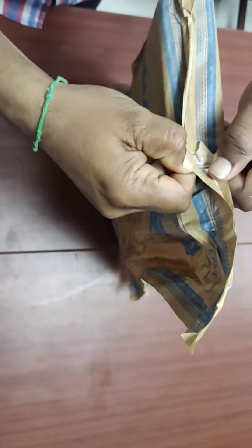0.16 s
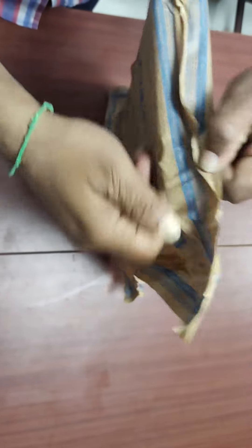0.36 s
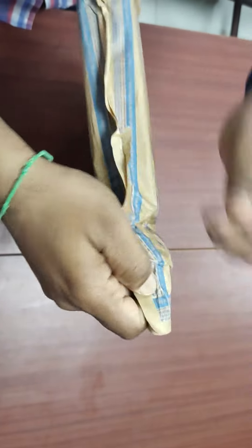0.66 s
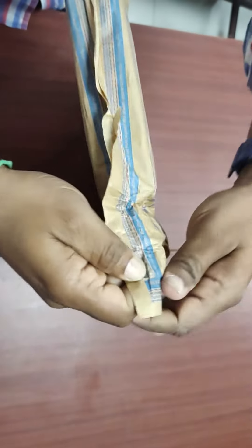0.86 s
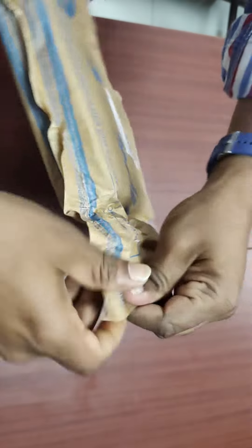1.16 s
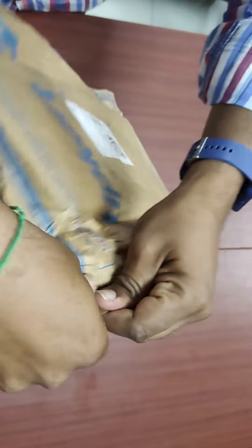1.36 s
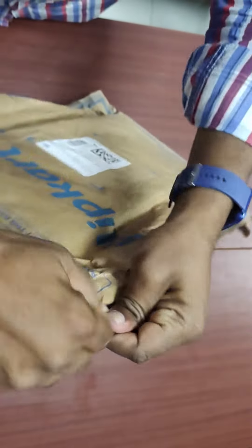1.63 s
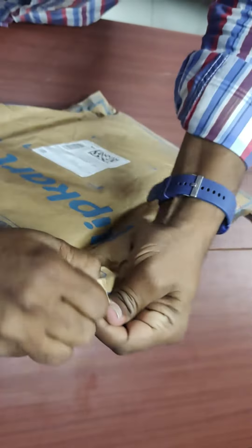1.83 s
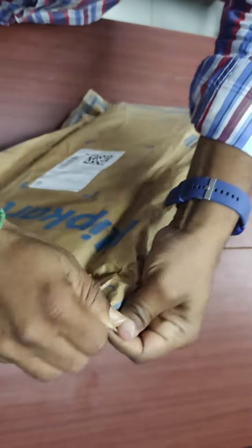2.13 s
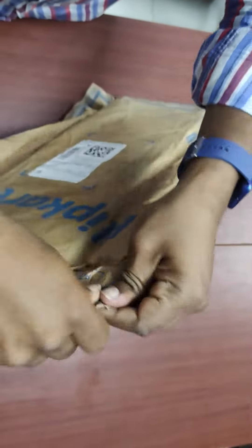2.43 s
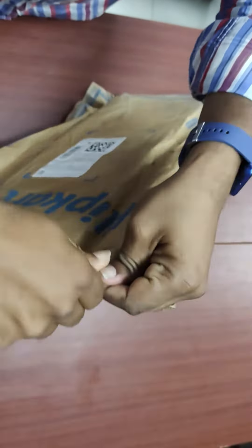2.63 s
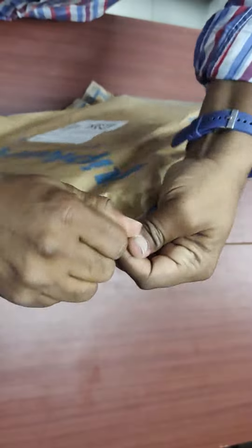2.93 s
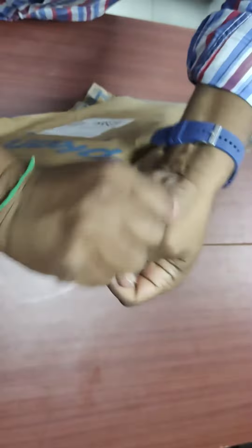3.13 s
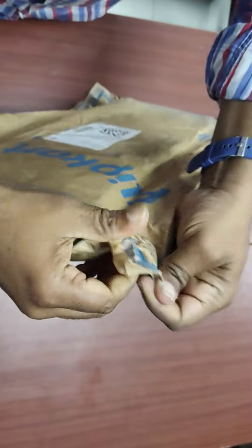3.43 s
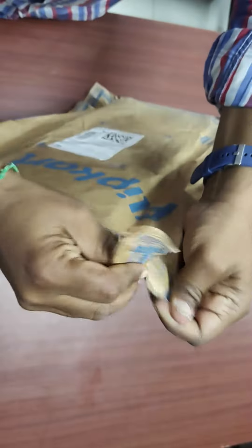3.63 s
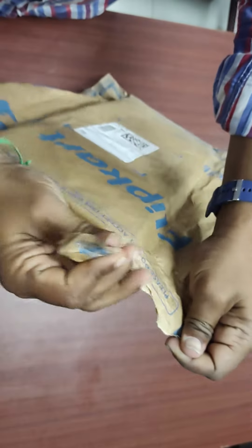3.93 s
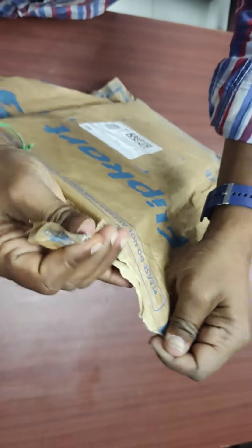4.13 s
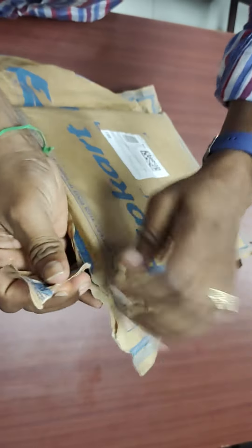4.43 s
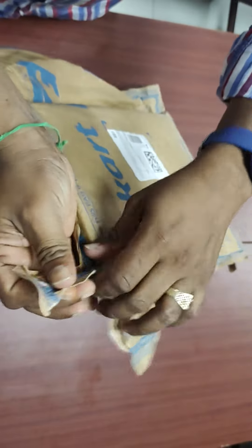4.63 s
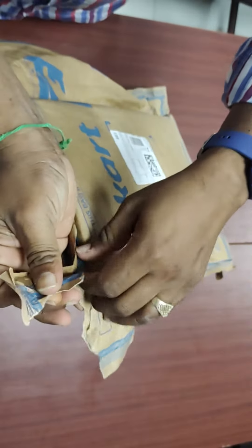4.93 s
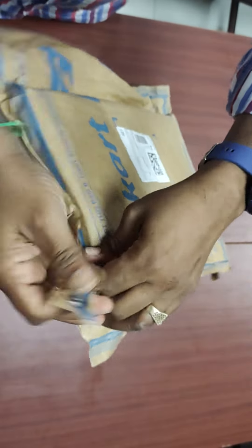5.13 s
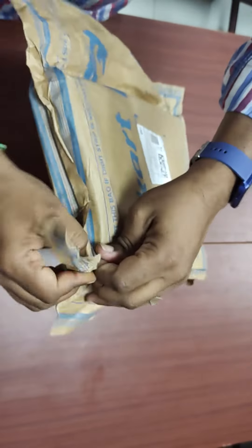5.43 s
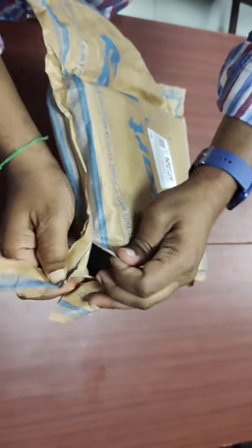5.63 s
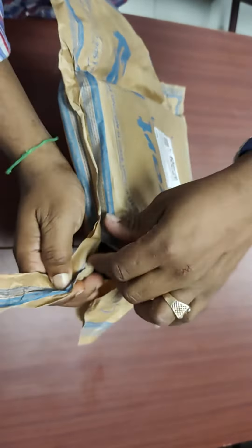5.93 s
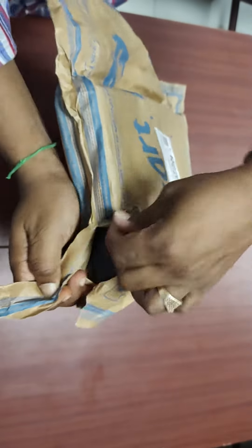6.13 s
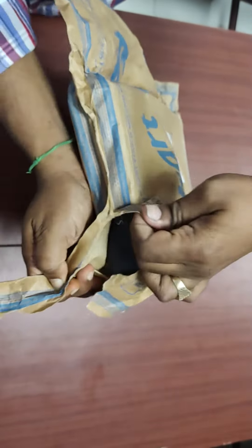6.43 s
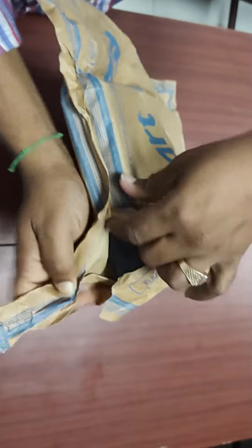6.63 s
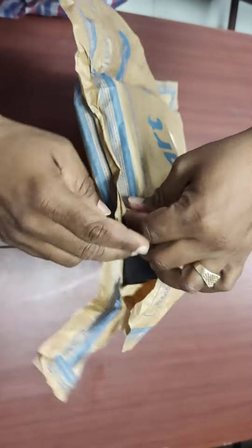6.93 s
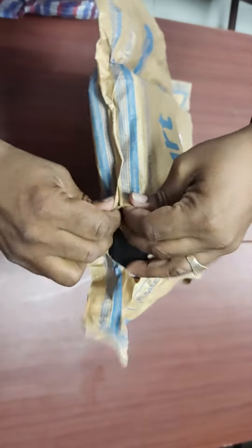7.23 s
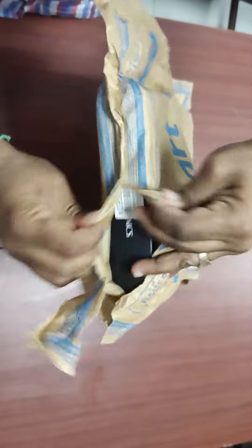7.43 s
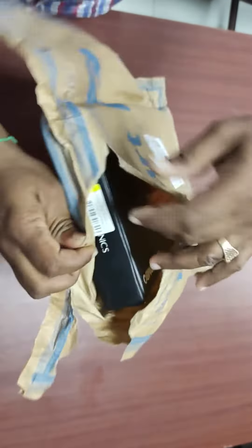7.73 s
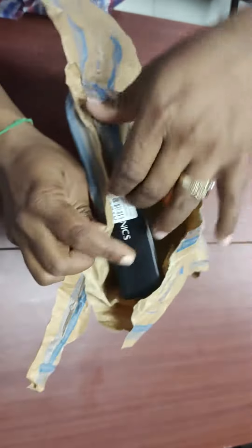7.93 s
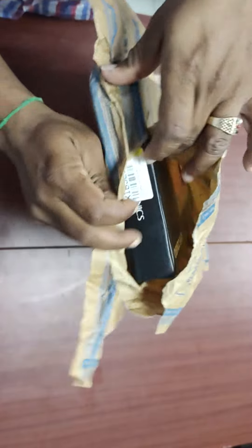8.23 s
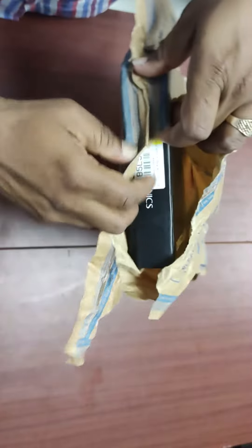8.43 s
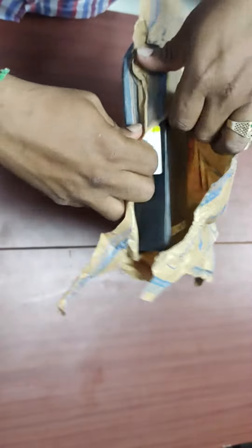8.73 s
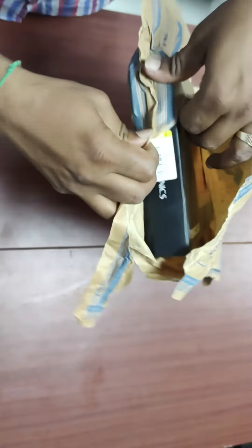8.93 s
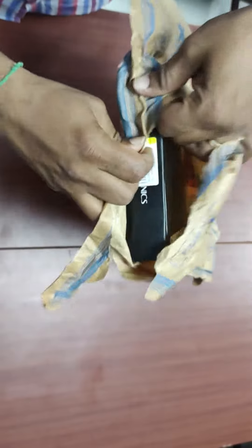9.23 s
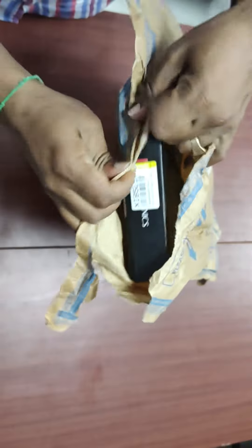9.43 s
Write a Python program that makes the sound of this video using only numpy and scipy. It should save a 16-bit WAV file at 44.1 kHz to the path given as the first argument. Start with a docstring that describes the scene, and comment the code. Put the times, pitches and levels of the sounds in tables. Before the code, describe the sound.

Close, dry paper crackling and ripping in irregular bursts as a padded mailer is pulled apart on a table in a small room.

```python
"""Hands tear and crumple a stiff paper mailer bag on a table, close to a phone with two microphone ports.
Creases snap as short cracks, fibres rip in dense bursts of grains, and the bag booms softly.
Filtered noise follows these bursts; bumps on the table thump and a small room answers.
At first a distant cutting wheel whines on multiples of its tooth rate, hisses and fades out.
A low, slowly wavering room tone lies under it all."""
import sys
import numpy as np
from scipy import signal
from scipy.fft import rfft, irfft, next_fast_len
from scipy.io import wavfile
from scipy.ndimage import uniform_filter1d, map_coordinates

SR = 44100
rng = np.random.default_rng(int(sys.argv[2]) if len(sys.argv) > 2 else 0)


def persist_wave(psi):
    """Save psi, clipped to +-1, as 16-bit WAV."""
    counts = np.round(np.clip(psi, -1, 1) * 32767).astype(np.int16)
    wavfile.write(sys.argv[1], SR, np.atleast_2d(counts).T)


N = 422037  # samples

# All levels in dB are relative settings.
# Effort of the hands. Each row: time in seconds, crinkle level in dB.
HANDLING = [(.28, -59), (.33, -44), (.6, -52.5), (1.2, -54), (1.33, -50), (1.42, -64), (1.9, -59.5),
            (2.02, -47), (2.17, -49.5), (2.25, -66.5), (2.78, -65), (3.09, -42.5), (3.3, -65), (4.1, -66),
            (4.3, -49.5), (4.5, -80), (4.72, -63), (5.4, -63), (5.8, -54), (6.12, -51.5), (6.35, -77.5),
            (6.7, -40.5), (6.96, -58), (7.32, -52.5), (7.49, -38), (7.9, -59), (8.26, -57.5), (8.31, -44),
            (8.78, -52.5), (9.3, -42.5), (9.45, -37), (9.57, -41.5)]
# Brightness of the handling. Each row: time in seconds, fibre fizz over crinkle in dB.
BRIGHTNESS = [(0, 2), (1.4, 2.5), (2.05, -14.5), (2.5, -9), (3.09, -17), (3.2, 1), (4.2, 5.5), (5.4, -1),
              (5.9, -9), (6.15, 3), (6.96, -12.5), (7.32, 13), (7.75, -3.5), (8.31, -0.5), (9.3, -4.5)]
# Single creases that snap. Each row: time in seconds, peak level in dB, fizz over peak in dB.
CREASE_SNAPS = [(0.122, -14.5, -5.5), (0.161, -35, 6), (0.296, -10, -2.5), (0.306, -19, -3.5),
                (0.372, -24.5, -8.5), (0.4, -32, 2), (0.617, -24.5, -8), (0.65, -27.5, -10.5),
                (0.807, -28, -13), (1.152, -19.5, -15.5), (1.246, -24.5, -9), (1.709, -32, -25.5),
                (1.8, -34, -21), (1.953, -31, -35), (1.994, -21.5, -17.5), (2.379, -34.5, -31),
                (2.411, -34.5, -30.5), (2.51, -33, -16.5), (2.731, -37, -20.5), (2.794, -38.5, -17.5),
                (2.844, -37, -19), (2.888, -38.5, -35), (2.901, -31, -11.5), (2.945, -29.5, -34),
                (2.999, -29, -22.5), (3.025, -32.5, -13), (3.057, -29, -26), (3.073, -20.5, -18),
                (3.084, -30.5, -9.5), (3.881, -28, -5), (3.934, -18.5, -1), (3.998, -15.5, -9),
                (4.051, -21.5, -7), (4.107, -23, -6.5), (4.154, -24, -5.5), (4.188, -25, -3),
                (4.255, -27.5, -11.5), (4.295, -29.5, -6.5), (4.63, -39, -21.5), (4.72, -29.5, -24),
                (5.064, -19.5, -10.5), (5.079, -22, -14.5), (5.422, -32.5, -37), (5.621, -25.5, -8.5),
                (5.649, -18.5, -16), (5.848, -31.5, -15), (6.019, -30, -35), (6.102, -29.5, -6),
                (6.207, -16, -7), (6.226, -11.5, -37), (6.407, -33, 0.5), (6.439, -21, -4),
                (6.542, -24, -12), (6.58, -20, -11.5), (6.645, -18, -9.5), (6.849, -23.5, -3.5),
                (6.982, -26, -22), (7.081, -14.5, -23), (7.109, -17.5, -8), (7.24, -24, -10),
                (7.313, -41.5, 6.5), (7.359, -23.5, 2.5), (7.388, -21, -2), (7.408, -31, 3),
                (7.435, -28.5, 2), (7.473, -21.5, -5), (7.504, -7.5, -14.5), (7.68, -12, -13),
                (7.741, -22.5, -2), (7.916, -26.5, -11.5), (8.184, -31.5, -9), (8.316, -31, -8.5),
                (8.382, -30.5, -4.5), (8.404, -12.5, -8), (8.496, -26, -26.5), (8.528, -23, -14),
                (8.666, -34, -8), (8.709, -39, 5), (8.805, -24, -19.5), (8.863, -22, -10.5),
                (8.94, -22, -8.5), (8.984, -18.5, 0.5), (9.11, -26, -25.5), (9.206, -27.5, 5),
                (9.216, -21, -7), (9.244, -19.5, -9.5), (9.301, -32.5, 2.5), (9.345, -16.5, -1.5),
                (9.441, -12, -15.5), (9.447, -11.5, -15), (9.515, -18.5, -15.5)]
# Running tears and the rustle after them. Each row: start in seconds, length in seconds,
# level at the start in dB, level at the end in dB, rustle level in dB.
TEARS = [(3.111, 0.078, -29, -28, -44.5), (3.709, 0.089, -35, -24, -43), (3.843, 0.029, -47, -43.5, -40.5),
         (3.895, 0.067, -31, -27.5, -31.5), (4.579, 0.019, -60, -72, -56),
         (5.025, .051, -41.5, -43.5, -68.5), (5.555, 0.0864, -40, -34.5, -42.5),
         (5.666, 0.04, -34.5, -32.5, -43), (5.723, 0.021, -36, -39, -69), (6.121, 0.082, -43, -25, -46.5),
         (6.37, .07, -45, -42, -46.5), (6.732, 0.022, -41, -34.5, -41.5), (7.499, 0.13, -21, -24, -29.5),
         (9.064, 0.017, -19.5, -34.5, -38), (9.339, 0.067, -24, -38, -40)]
# Bumps of the bag on the table. Each row: time in seconds, level in dB.
TABLE_BUMPS = [(0.293, -41.5), (1.24, -45), (2.658, -51.5), (4.047, -45), (8.938, -47.5), (9.074, -47.5),
               (9.34, -38.5), (9.44, -42.5)]
# How far the bag is pressed flat. Each row: time in seconds, share of the crinkle that sounds pressed (0 to 1).
PRESSED_SHARE = [(1.1, 0.089), (1.5, 0.91), (2.7, 0.97), (3.1, 0.051)]
# Place of the bag between the ports. Each row: time in seconds, left over right in dB.
BAG_PAN = [(0, 2), (1.2, -0.5), (2.7, 0), (5.1, -2.5), (7.7, -1), (8.2, -3.5), (8.8, -1), (9.57, -1)]
# Colours of the free crinkle, the bag pressed flat, the fibre fizz, the boom of the bag, the table thump
# and the room tone. Each row: frequency in Hz, density in dB per Hz.
CRINKLE_COLOUR = [(200, -74), (500, -15), (900, -9), (1500, -1.5), (2300, 3), (3000, -4), (6000, -16.5),
                  (9000, -36)]
PRESSED_COLOUR = [(200, -59), (600, -11.5), (1300, -3.5), (1600, 3), (1950, -0.5), (3000, -9),
                  (6000, -26.5), (9000, -39.5)]
FIZZ_COLOUR = [(1500, -62.5), (3000, -6), (4150, -2), (6500, 0.5), (9300, -2.5), (13600, -8), (15700, -7)]
BOOM_COLOUR = [(25, -41), (128, -11.5), (200, -8), (465, -4), (900, -6), (1500, -13.5), (2500, -92)]
TABLE_COLOUR = [(30, -45.5), (120, -14.5), (220, -10.5), (400, -11), (1000, -47)]
ROOM_TONE_COLOUR = [(15, -57.5), (25, -12), (137, -0.5), (222, -2.5), (342, -6.5), (570, -14), (2140, -6.5),
                    (15700, -29)]
# Course of the cutting wheel. Each row: time in seconds, mean tooth rate in Hz, level in dB.
WHEEL_COURSE = [(0, 2816, -43.5), (.28, 2870, -43), (.45, 2820, -45), (1.1, 2830, -44.5),
                (1.35, 2920, -50.5), (1.8, 2830, -86)]
# Partials of the whine. Each row: multiple of the tooth rate, level in dB.
TOOTH_PARTIALS = [(1, 4.5), (3, 0), (4, -2.5), (5, 2.5)]
# Resonances of the blade. Each row: centre in Hz, width in Hz, level in dB.
BLADE_MODES = [(6015, 63, 3.5), (7540, 98, -7.5), (9250, 60, -1), (9950, 85, -7.5), (11080, 260, -3.5),
               (9400, 4700, -11)]
# Decay of the small room. Each row: frequency in Hz, time to fall 60 dB in seconds.
ROOM_DECAY = [(200, 0.66), (2000, 0.29), (10000, 0.27)]
# Likeness of left and right in the noise of the bag, table thumps and room tone.
# Each row: frequency in Hz, correlation.
NOISE_LIKENESS = [(40, 0.83), (180, 1), (700, 0.89), (2800, 0.31), (5000, 0.057), (12000, 0.15)]
# Colour of the ports. Each row: frequency in Hz, left over right in dB.
PORT_BALANCE = [(40, -0.5), (350, 4), (1400, -3), (5000, 1), (14000, 2)]

RIP_FIZZ_DB, SETTLE_DB_PER_S = 4.5, 96  # fizz of a tear over its crinkle; how fast the rustle fades
ROLL_HZ, TOP_HZ = 15800, 16968  # the treble steps down, then ends


def paper():
    """Harder handling breaks more fibres a second; crinkle, fizz and boom are noise driven by those breaks."""
    (hands_db,), (fizz_db,) = curves(HANDLING), curves(BRIGHTNESS)
    tear, rustle = rips()
    snap_crinkle, snap_fizz = snaps()
    db = 10 * np.log10(amp(hands_db) ** 2 + rustle)
    work = amp(db) ** 2 + tear
    tear_share = tear / work
    rate = 500 * (work / amp(-52.5) ** 2) ** 0.33  # breaks a second

    # a running tear stutters faster
    clump = amp((5.5 - 1.6 * tear_share) * wobble(35) + 2.2 * tear_share * wobble(110))
    # a crease gives way over a millisecond or two
    shared = dying(grains(rate, spread_db=7.0), 0.019)
    crackle = dying(0.5 * shared + 0.5 * grains(rate, spread_db=5.0), 0.022)
    crinkle = work * clump * (0.21 + crackle)

    fibres = dying(0.55 * shared + 0.28 * grains(7.7 * rate, spread_db=7.0), 0.027)
    fizz_power = amp(db + fizz_db) ** 2 + amp(RIP_FIZZ_DB) ** 2 * tear
    fizz = fizz_power * clump * (0.2 + fibres)

    # the boom grows more slowly than the crinkle
    boom_power = amp(0.8 * db - 18.5) ** 2 + amp(-17.5) ** 2 * tear
    boom = dying(crinkle * boom_power / work, 0.036)

    pressed = np.clip(*curves(PRESSED_SHARE), 0, 1)
    bag = shaken((1 - pressed) * crinkle, CRINKLE_COLOUR, patchy_db=4.0)
    bag = bag + shaken(pressed * (crinkle + snap_crinkle), PRESSED_COLOUR, patchy_db=3.0)
    # a single crease cracks thinner
    bag = bag + shaken((1 - pressed) * snap_crinkle, CRINKLE_COLOUR, patchy_db=2.5, sharp=1.19)
    bag = bag + shaken(fizz, FIZZ_COLOUR, patchy_db=3.5)
    bag = bag + shaken(snap_fizz, FIZZ_COLOUR, patchy_db=2.5)
    bag = bag + shaken(boom, BOOM_COLOUR, patchy_db=3.5)
    bag = bag + table_thumps()
    pan_db, = curves(BAG_PAN)
    return bag * amp([pan_db / 2, -pan_db / 2])


def rips():
    """Power of the tears, which set in fast and stop dead, and of the rustle as the loosened sheet comes to rest."""
    tear, rustle, t = np.zeros(N), np.zeros(N), np.arange(N) / SR
    for s, length, first_db, last_db, rustle_db in TEARS:
        end = s + length
        onset = np.clip((t - s) / 0.014, 0, 1)
        stop = np.clip((end - t) / 0.0092, 0, 1)
        tear_db = np.interp(t, [s, end], [first_db, last_db])
        tear = tear + onset * stop * amp(tear_db) ** 2
        settling_db = rustle_db - SETTLE_DB_PER_S * np.maximum(t - end, 0)
        rustle = rustle + onset * amp(settling_db) ** 2
    return tear, rustle


def snap_shape(t, crack_s, t60):
    """Power of one snap: a short crack peaking at crack_s, then the sheet shudders and dies away."""
    crack = (t / crack_s * np.exp(1 - t / crack_s)) ** 4
    shudder = (t > crack_s) * amp(-5.5 - 60 * t / t60) ** 2
    return crack + shudder


def snaps():
    """Power of the single creases, as crinkle and as a quicker fizz."""
    crinkle, fizz, t = np.zeros(N + SR), np.zeros(N + SR), np.arange(SR // 10) / SR
    low, high = snap_shape(t, 0.0022, 0.058), snap_shape(t, 0.0012, 0.034)
    for s, db, fizz_db in CREASE_SNAPS:
        start = round(s * SR)
        crinkle[start:][:len(t)] += low * amp(db - 7.0) ** 2
        fizz[start:][:len(t)] += high * amp(db + fizz_db + 4.5) ** 2
    return crinkle[:N], fizz[:N]


def table_thumps():
    """Each bump of the bag sets off a dull burst of noise that swells briefly and dies away in the table."""
    s, bump_db = np.transpose(TABLE_BUMPS)
    bumps = np.bincount(np.round(s * SR).astype(int), amp(bump_db) ** 2 * SR / 100, N)
    return shaken(dying(dying(bumps, 0.03), 0.35), TABLE_COLOUR, patchy_db=-1.5)


def room(x):
    """The small room answers after 200 samples; each frequency of its noise tail dies at its own speed."""
    hz, t, z = signal.stft(rng.standard_normal((2, SR // 2)), SR, nperseg=256)
    decay = amp(-60 * t / along(ROOM_DECAY, hz)[:, None])
    tail = signal.istft(z * decay, SR, nperseg=256)[1]
    delayed = np.pad(x, ((0, 0), (200, 0)))
    return signal.fftconvolve(delayed, tail / np.linalg.norm(tail[0]), axes=1)[:, :N]


def wheel():
    """Teeth sing roughly at multiples of a wavering rate; the cut hisses through the blade's modes."""
    tooth_hz, db = curves(WHEEL_COURSE)
    t = np.arange(N) / SR
    turns = 2 * np.pi * np.cumsum(tooth_hz * (1 + 0.0052 * wobble(8))) / SR  # phase in radians
    # the top multiple is strongest where the cut bites hardest, at 0.55 s
    bite_db = -14 * np.clip(np.abs(t - 0.55) / 0.4, 0, 1)
    top = TOOTH_PARTIALS[-1][0]
    sizes = [amp(level + (k == top) * bite_db) for k, level in TOOTH_PARTIALS]
    song = [sum(size * (0.5 + wobble(260)) * np.sin(k * turns)
                for size, (k, _) in zip(sizes, TOOTH_PARTIALS)) for ear in "LR"]
    hiss = unit(filtered(rng.standard_normal((2, N)), blade_response))
    hiss = hiss * amp(0.87 * wobble(8.7))
    ring_level = amp(-1.5 - 150 * np.maximum(t - 0.3, 0))  # fades from 0.3 s on
    early_ring = ring_level * wobble(220) * np.sin(2 * np.pi * 4640 * t)
    return amp(db) * (amp(-6) * unit(np.array(song)) + hiss + early_ring)


def blade_response(f):
    """The blade's modes as a sum of band-pass resonances."""
    return sum(amp(level) * 1j * f * w / (c * c - f * f + 1j * f * w) for c, w, level in BLADE_MODES)


def room_tone():
    """Steady noise of the place, its level drifting slowly at random."""
    return shaken(amp(-66 + 1.6 * wobble(4.8)) ** 2, ROOM_TONE_COLOUR, patchy_db=-1.0)


def shaken(power, spectrum, patchy_db, sharp=1):
    """Stereo noise of a colour, gated by a power envelope; sharp scales the colour's dB below 2300 Hz."""
    def colour(hz):
        level = unit(amp(np.where(hz < 2300, sharp, 1) * along(spectrum, hz)))
        # this split into middle and side gives the wanted likeness of left and right
        turn = np.arccos(np.clip(along(NOISE_LIKENESS, hz), -1, 1)) / 2
        return level * [np.cos(turn), np.sin(turn)]

    mid, side = filtered(np.sqrt(power) * patchy(patchy_db), colour)
    return np.array([mid + side, mid - side])


def patchy(depth_db):
    """Two noises whose shared colour shifts at random from moment to moment."""
    z = signal.stft(rng.standard_normal((2, N + 512)), nperseg=512)[2]
    field = uniform_filter1d(rng.standard_normal(z.shape[1:]), size=7, axis=0)  # smooth over frequency
    field = uniform_filter1d(field, size=3, axis=1)  # and over time
    return unit(signal.istft(z * amp(depth_db * unit(field)), nperseg=512)[1][:, :N])


def grains(rate, spread_db):
    """Random impulses of power at rate a second, mean 1, with a few much larger than the rest."""
    size = np.minimum(amp(spread_db * rng.exponential(size=N)) ** 2, 400)
    chance = np.clip(rate / SR, 0, 1)
    hits = (rng.random(N) < chance) * size / chance
    return hits / np.mean(size)


def dying(x, t60):
    """Every impulse of power starts at once and falls 60 dB in t60 seconds; its energy is kept."""
    keep = 10 ** (-6 / (max(t60, 0.001) * SR))
    return np.abs(signal.lfilter([1 - keep], [1, -keep], x))


def wobble(rate):
    """A smooth random curve, rate knots a second."""
    return map_coordinates(rng.standard_normal(N // 100), [np.arange(N) * rate / SR])


def curves(rows):
    """One value per sample for each column after the time."""
    s, *cols = np.transpose(rows)
    return [np.interp(np.arange(N) / SR, s, c) for c in cols]


def along(points, hz):
    """Interpolate (Hz, value) points on a log frequency axis."""
    f, v = np.transpose(points)
    return np.interp(np.log(hz + 1), np.log(f + 1), v)


def filtered(x, response):
    """x times a complex response of frequency."""
    m = next_fast_len(N + SR // 2)
    return irfft(rfft(x, m) * response(np.fft.rfftfreq(m, 1 / SR)), m)[..., :N]


def amp(db):
    """Amplitude factor of a level in dB."""
    return 10 ** (np.asarray(db) / 20)


def unit(x):
    """x scaled to an RMS of 1."""
    return x / np.sqrt(np.mean(x ** 2) + 1e-20)


def scene():
    """The bag up close with its room answer, the distant wheel and the room tone."""
    bag = paper()
    return bag + amp(-9.0) * room(bag) + wheel() + room_tone()


def record(dry):
    """The left port is nearer and coloured differently; the loudest cracks are squeezed and the treble is cut."""
    lead_s = 0.00013  # left ahead of right

    def half(hz):
        return amp(along(PORT_BALANCE, hz) / 2) * np.exp(1j * np.pi * hz * lead_s)

    ports = filtered(dry, lambda hz: np.array([half(hz), 1 / half(hz)]))
    squeezed = ports / (1 + (ports / 0.9) ** 4) ** (1 / 4)
    return filtered(squeezed, lambda hz: np.where(hz < ROLL_HZ, 1, amp(-34.0)) * (hz < TOP_HZ))


dry = scene()
out = record(dry)
persist_wave(out)
```